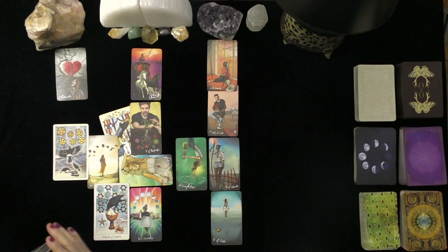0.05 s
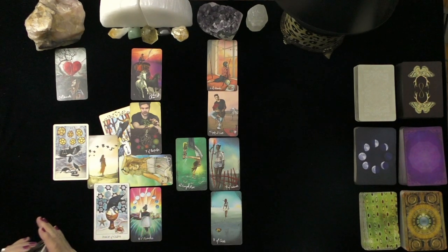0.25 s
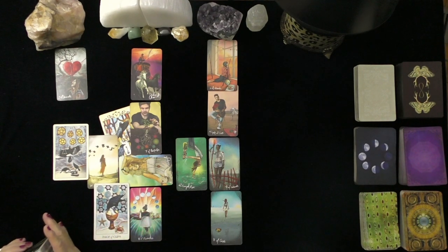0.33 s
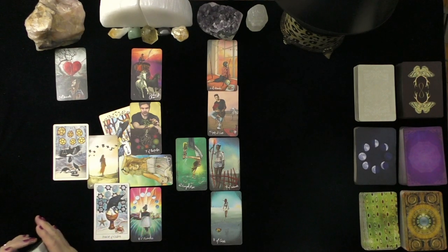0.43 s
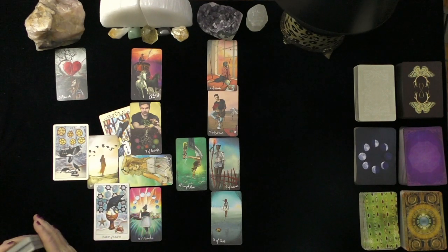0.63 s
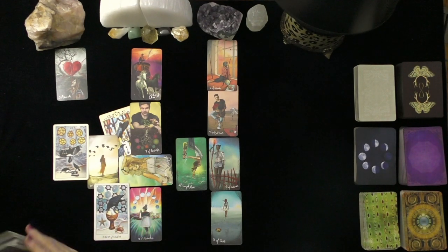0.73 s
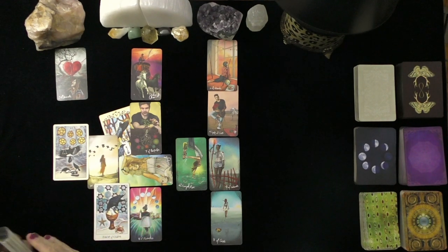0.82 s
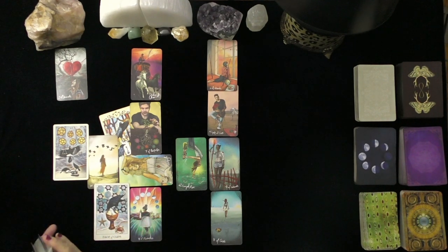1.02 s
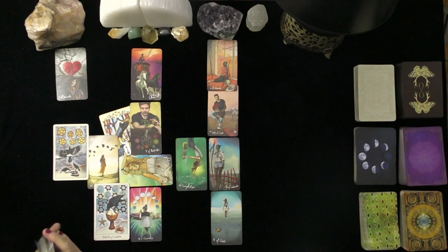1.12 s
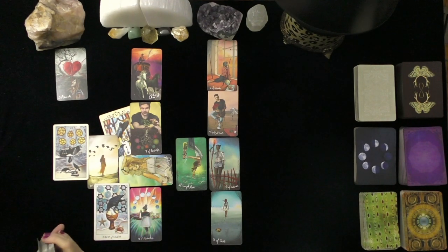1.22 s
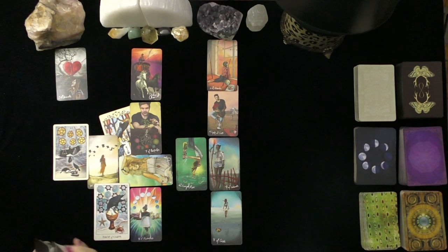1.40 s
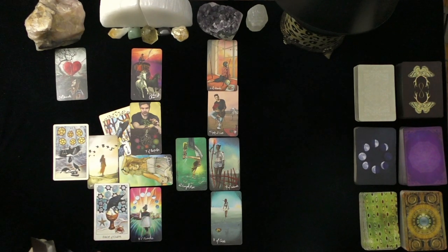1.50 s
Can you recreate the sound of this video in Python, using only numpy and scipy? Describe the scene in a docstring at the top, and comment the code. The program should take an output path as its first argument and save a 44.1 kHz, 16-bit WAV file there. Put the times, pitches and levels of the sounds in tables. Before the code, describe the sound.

A card deck is slapped onto a wooden table in a small quiet room, close to a phone microphone. Faint fading room sound and low air come first, a gritty card brush at 0.16 seconds, then the loud clattering thump at 0.22-0.28. Low stand trembling and a short room tail follow, with soft slides, faint knocks, ticks near 0.75 and 0.97, and a sharp snap at 1.53.

```python
"""First the fading room sound of something earlier and soft air, then cards brush and a deck is slapped down.
The place is a small quiet room, with a phone microphone close to a wooden table.
The deck lands in damped snaps and a burst of clatter; pushes ring the table's modes.
Cards slide as strokes of gritty hiss, and edges snap as short swings with a crack of noise.
The phone stand trembles as a wavering low swing with rumble; a diffuse tail gives the room."""
import sys
import numpy as np
from scipy import signal
from scipy.fft import rfft, irfft
from scipy.io import wavfile
from scipy.ndimage import uniform_filter1d

SR = 44100
rng = np.random.default_rng(int(sys.argv[2]) if len(sys.argv) > 2 else 0)


def inscribe(sig):
    """Save sig as 16-bit PCM at rate SR to the path in sys.argv[1].

    A 1-D sig is mono; a 2-D sig holds one channel per row.
    Samples are clipped to [-1, 1] before scaling.
    """
    pcm = np.round(np.clip(np.atleast_2d(sig).T, -1, 1) * 32767)
    wavfile.write(sys.argv[1], SR, pcm.astype(np.int16))


def invert_db(level):
    """Linear amplitude ratio for a level in decibels (20 dB per decade), elementwise."""
    return 10 ** (np.asarray(level, dtype=float) / 20)


N = 68355  # length in samples


def unit(x):
    """Scales a signal to rms 1."""
    return x / np.sqrt(np.mean(x ** 2))


def conv(x, response):
    """Lets a signal excite a response, cut to the scene's length."""
    return signal.fftconvolve(x, response)[:N]


def noise(points):
    """Noise of rms 1 coloured by (Hz, dB) points, joined along log frequency."""
    points = np.array(points, float)
    hz = np.fft.rfftfreq(N, 1 / SR) + 1  # keeps the logarithm finite
    colour_db = np.interp(np.log(hz), np.log(points[:, 0]), points[:, 1])
    return unit(irfft(rfft(rng.standard_normal(N)) * invert_db(colour_db), N))


def curve(rows):
    """Straight lines between (seconds, value) points."""
    points = np.array(rows, float)
    return np.interp(np.arange(N) / SR, points[:, 0], points[:, 1])


def walk(rate_hz):
    """Random levels held for 1 / rate_hz seconds and smoothed, rms 1."""
    hold = int(SR / rate_hz)
    steps = np.repeat(rng.standard_normal(N // hold + 1), hold)
    return unit(uniform_filter1d(steps, hold)[:N])


def add(out, at_s, x):
    """Mixes a short sound into out at a given second."""
    start = int(at_s * SR)
    out[start:start + len(x)] += x[:N - start]


# The deck landing close by, packet after packet.
# Each row: start in seconds, level in dB, pitch in Hz.
PACKETS = [(.2198, -12, 900), (.2212, -7, 1050), (.2245, -8, 1050), (.2258, -6, 950), (.2288, -6, 800),
           (.2322, -13, 1100)]


def landing():
    """Each packet is a heavily damped swing with very little crack."""
    crack_db = -42  # relative to the swing
    return snaps([(*row, crack_db) for row in PACKETS])


# Colour of the loose cards clattering. Each row: frequency in Hz, relative level in dB per Hz.
CLATTER_COLOUR = [(300, -30), (700, -2), (1200, -.5), (2200, -7), (3000, -17), (4200, -36), (5500, -50),
                  (9000, -60)]


def clatter():
    """Loose cards clatter as the deck lands: a dense noise burst that swells quickly and dies."""
    start_s, level_db, rise_s, t60_s = .2195, -11, .004, .07
    t = np.maximum(np.arange(N) / SR - start_s, 0)
    swell = 1 - np.exp(-t / rise_s)
    return noise(CLATTER_COLOUR) * swell * invert_db(level_db - 60 * t / t60_s)


# Blows of the hand on the table top. Each row: start in seconds, level in dB, contact in ms.
HAND_BLOWS = [(.203, -29, 2.4), (.212, -21, 4.0), (.2197, -14, 1.0), (0.2284, -4.5, 2.2),
              (0.2343, -2.5, 3.75), (0.283, -14, 7.3), (.434, -25.5, 5.5), (.618, -25.5, 5.2),
              (.812, -34, 5.0), (0.969, -42, 4.0), (1.529, -36, 5.2)]
# Modes of the wooden table. Each row: frequency in Hz, relative level in dB, 60 dB decay in seconds.
TABLE_MODES = [(40, -5, .28), (55, -1.5, .16), (78, -5, .12), (119, -8, .14), (138, -1.5, .09),
               (168, -4, .13), (189, -9.5, .26), (286, -11, .12), (335, -1, .08), (395, -5, .08),
               (585, 5, .07), (860, -4, .05), (975, -4, .4), (1125, -5, .08), (1215, 0, .05),
               (1515, 0, .05), (2090, -6, .04), (2530, -6, .04)]


def table():
    """Each blow is a smooth push that rings the same table modes; longer contact is duller."""
    t = np.arange(SR // 2) / SR
    ring = np.zeros(len(t))
    for hz, db, t60_s in TABLE_MODES:
        ring += invert_db(db) * np.sin(2 * np.pi * hz * t) * np.exp(-np.log(1000) * t / t60_s)

    # Each packet of the deck also knocks the table: 20 dB under its row, with 0.4 ms contact.
    knocks = [(start_s, db - 20, .4) for start_s, db, _ in PACKETS]
    push = np.zeros(N)
    for start_s, db, contact_ms in [*HAND_BLOWS, *knocks]:
        phase = np.clip(t[:900] / (contact_ms / 1000), 0, 1)
        area_scale = 2000 / (contact_ms * SR)  # the same impulse for any contact time
        add(push, start_s, -invert_db(db) * np.sin(np.pi * phase) ** 2 * area_scale)
    return conv(push, ring)


# Card edges snapping near the microphone.
# Each row: start in seconds, level in dB, pitch in Hz, crack in dB relative to the swing.
EDGE_SNAPS = [(0.645, -39, 1570, -8), (0.7294, -36, 1780, 2), (0.7303, -33, 1700, -3),
              (0.7341, -44, 2000, 8), (.7506, -24, 340, -3), (.7513, -30, 3800, 7), (.752, -25, 720, -8),
              (.9662, -36, 2000, -14), (.972, -35, 1900, -14), (.9752, -25, 1350, -26),
              (.9775, -24.5, 1150, -26), (.981, -34, 1700, -12), (.987, -38, 1800, -10),
              (1.5273, -6, 3900, -19), (1.52752, -8.5, 1030, -28), (1.5292, -23, 300, -23),
              (1.538, -35, 3000, -12)]


def snaps(rows):
    """A card edge lets go: a heavily damped swing with a brief crack of noise."""
    decay_cycles, crack_decay_s, crack_band_hz = .52, .0007, (2000, 8000)
    out, t = np.zeros(N), np.arange(600) / SR
    band = signal.butter(1, crack_band_hz, "band", fs=SR, output="sos")
    cracks = signal.sosfilt(band, rng.standard_normal((len(rows), 600)))
    for (start_s, db, hz, crack_db), crack in zip(rows, cracks):
        onset = 1 - np.exp(-(t * hz / .33) ** 2)  # rounds the start within a third of a cycle
        swing = -3 * np.sin(2 * np.pi * hz * t) * np.exp(-t * hz / decay_cycles) * onset
        crack = 2 * invert_db(crack_db) * crack * np.exp(-t / crack_decay_s)
        add(out, start_s, invert_db(db) * (swing + crack))
    return out


# Dull and bright rubbing of paper. Each row: frequency in Hz, relative level in dB per Hz.
DULL_RUB = [(400, -30), (900, -11), (1370, -3), (2470, -3), (2960, -5.5), (6410, -9), (7580, -7),
            (14000, -14), (16000, -21)]
BRIGHT_RUB = [(880, -37), (1500, -7), (2370, -13), (2460, -9), (5330, -3), (10600, -4), (16000, -9)]
# Cards sliding over each other. Each row: loudest moment in seconds, rise in dB per ms,
# fall in dB per ms, level in dB, brightness from 0 (dull) to 1 (bright).
STROKES = [(.156, 9.0, .16, -41, .3), (.226, .2, .7, -45, .8), (.432, .35, .6, -52, .7),
           (.61, .8, .3, -58, .4), (.665, .25, .1, -52, .3), (.745, .2, .4, -53, .9),
           (.785, .15, .3, -56, .1), (.93, .9, .1, -54, .6), (.972, .3, .3, -50, 0),
           (.984, .35, .65, -49, .7), (1.065, .5, .4, -59, .6), (1.198, 6.0, .5, -54, 1),
           (1.228, .5, 1.2, -57, .9), (1.31, .15, .1, -65, .5), (1.385, .4, .05, -59, .5),
           (1.487, .15, .35, -42.5, .9), (1.54, 1.2, .1, -54, .2)]


def slide():
    """Paper on paper: strokes of gritty hiss that swell and fade."""
    grit = invert_db(2.6 * walk(1500) + 1.6 * walk(90))  # fine grit and slower flicker, in dB
    dull = unit(noise(DULL_RUB) * grit)
    bright = unit(noise(BRIGHT_RUB) * grit)
    ms = np.arange(N) / SR * 1000
    out = np.zeros(N)
    for peak_s, rise, fall, db, brightness in STROKES:
        after_ms = ms - peak_s * 1000
        stroke = invert_db(db - np.maximum(-rise * after_ms, fall * after_ms))
        out += stroke * (np.sqrt(1 - brightness) * dull + np.sqrt(brightness) * bright)
    return out


# Trembling of the phone stand. Each row: time in seconds, level in dB.
STAND_LEVEL = [(0, -62), (.15, -52), (.3, -38), (.38, -32), (.74, -32), (.785, -43), (.85, -37), (.92, -44),
               (1.1, -43), (1.21, -45), (1.3, -53), (1.55, -54)]
# Colour of the stand's rumble. Each row: frequency in Hz, relative level in dB per Hz.
RUMBLE_COLOUR = [(40, -30), (70, -4), (120, 0), (200, -5), (300, -22), (800, -60)]


def stand():
    """The stand under the microphone: a low swing wavering in pitch and size, with uneven rumble."""
    swing_hz = 33 + 3.5 * walk(12)
    swing = unit(np.sin(2 * np.pi * np.cumsum(swing_hz) / SR))
    rumble = noise(RUMBLE_COLOUR) * invert_db(-10 + 3 * walk(25))  # dB relative to the swing
    return (swing + rumble) * invert_db(curve(STAND_LEVEL) + 2.5 * walk(14))


# Tail of the small room. Each row: band centre in Hz, relative level in dB, 60 dB decay in seconds.
ROOM_BANDS = [(100, -25, .4), (250, -20, .45), (500, -12, .6), (1000, -4.5, 0.55), (2000, -6, .42),
              (3500, -1, .33), (8000, -20, .2)]


def room(x):
    """Diffuse tail built from noise bands, each dying at its own pace."""
    level_db, fade_in_s = -14.5, .004
    t, tail = np.arange(N) / SR, np.zeros(N)
    for hz, db, t60_s in ROOM_BANDS:
        band = noise([(hz / 8, -70), (hz / 2, -12), (hz, 0), (hz * 2, -12), (hz * 8, -70)])
        tail += invert_db(db) * band * np.exp(-np.log(1000) * t / t60_s)
    tail *= np.clip(t / fade_in_s, 0, 1) ** 2
    tail /= np.sqrt(np.sum(tail ** 2))
    return conv(x, tail) * invert_db(level_db)


# Room sound left from something earlier. Each row: frequency in Hz, relative level in dB per Hz.
EARLIER_COLOUR = [(200, -30), (420, 0), (600, -6), (900, -9), (1250, -14), (1600, -4), (2050, -19),
                  (2550, -11), (3200, -22), (5000, -19), (8000, -28), (12000, -40)]


def earlier():
    """Coloured noise that fades steadily from the first moment."""
    level_db, t60_s = -50.5, 1.1
    t = np.arange(N) / SR
    return noise(EARLIER_COLOUR) * invert_db(level_db - 60 * t / t60_s)


# Steady air of the quiet room. Each row: frequency in Hz, relative level in dB per Hz.
AIR_COLOUR = [(24, -30), (40, -10), (70, -6), (115, -1), (160, -9), (200, -3), (250, -14), (430, -20),
              (800, -24), (1400, -31), (2200, -41), (5000, -47), (10000, -56), (16000, -62)]


def air():
    """Steady coloured noise, mostly low."""
    return noise(AIR_COLOUR) * invert_db(-44.5)


def scene():
    """Mixes the slap, the handled cards, their room and the background into one channel."""
    slap = landing() + clatter() + table()
    cards = snaps(EDGE_SNAPS) + slide()
    tail = room(slap + invert_db(-6) * cards)  # the cards excite the room 6 dB less
    return (slap + cards + tail + stand() + earlier() + air())[None]


def low_pass(x):
    """Removes everything above the highest recorded frequency."""
    return signal.sosfilt(signal.butter(12, 16490, fs=SR, output="sos"), x)


def record(dry):
    """The phone loses the deepest bass, rounds off the loudest swings and cuts the top."""
    ceiling = 0.99
    bass_cut = signal.butter(2, 29, "high", fs=SR, output="sos")
    top_cut = signal.ellip(8, .2, 60, 15900, fs=SR, output="sos")
    x = signal.sosfilt(bass_cut, dry)
    x = x / (1 + np.abs(x / ceiling) ** 4) ** .25
    x = signal.sosfilt(top_cut, x)
    return low_pass(x)


dry = scene()
out = record(dry)
inscribe(out)
```